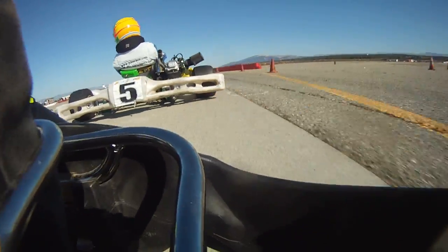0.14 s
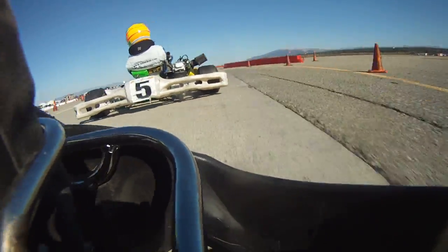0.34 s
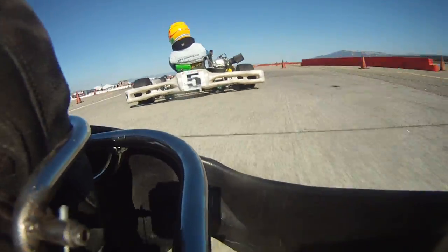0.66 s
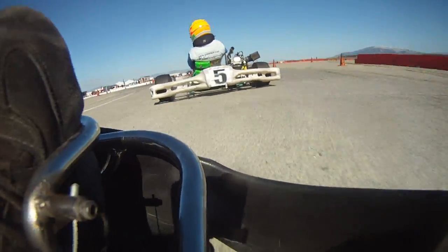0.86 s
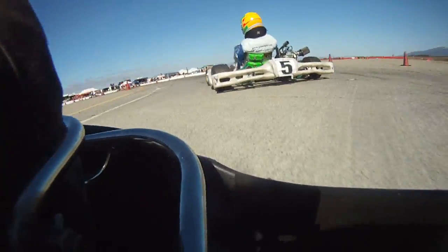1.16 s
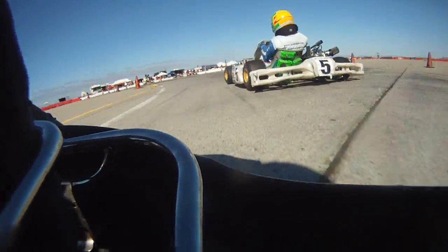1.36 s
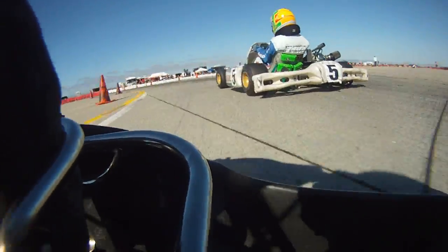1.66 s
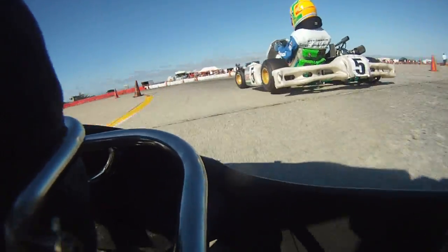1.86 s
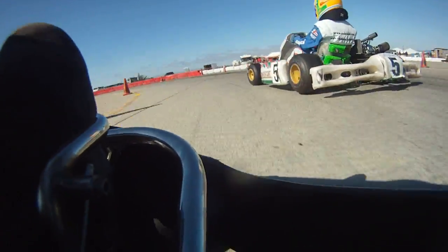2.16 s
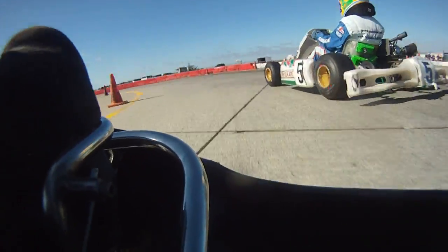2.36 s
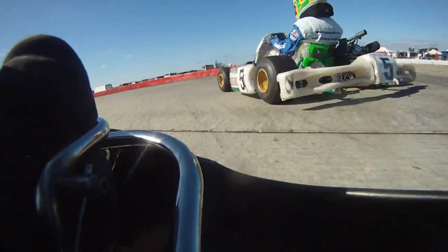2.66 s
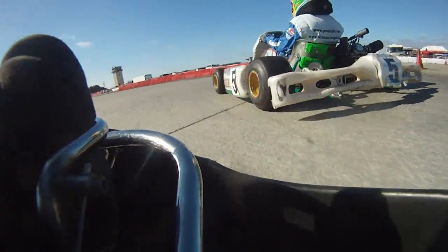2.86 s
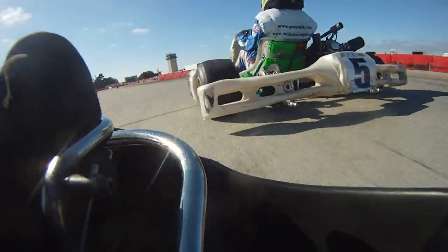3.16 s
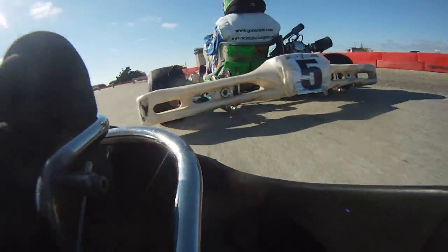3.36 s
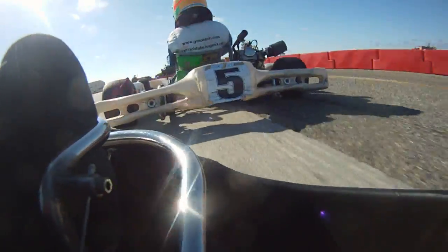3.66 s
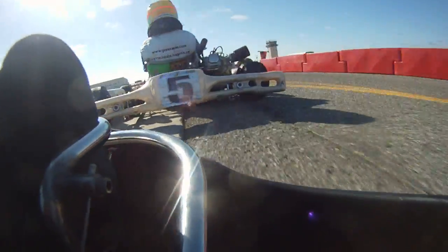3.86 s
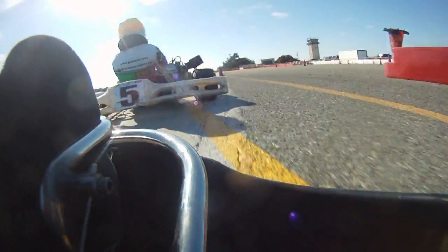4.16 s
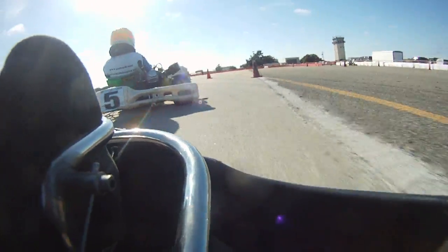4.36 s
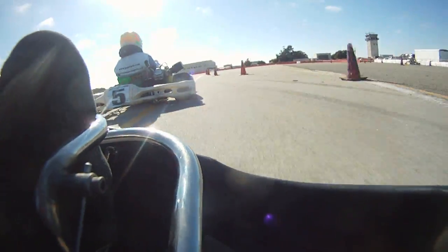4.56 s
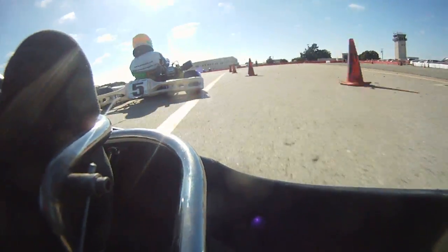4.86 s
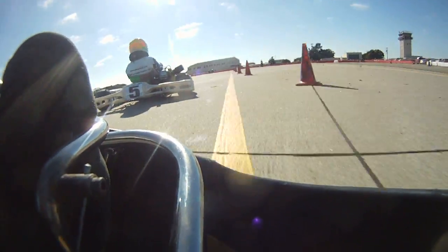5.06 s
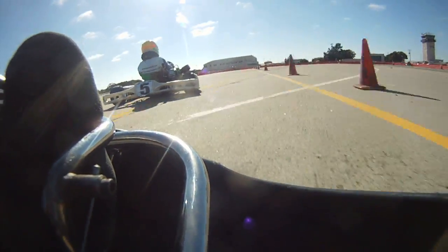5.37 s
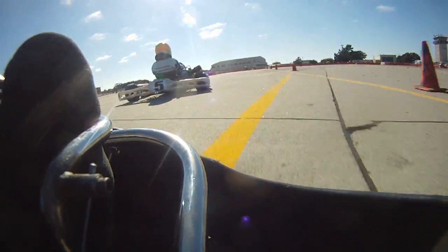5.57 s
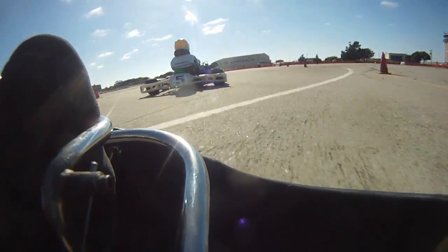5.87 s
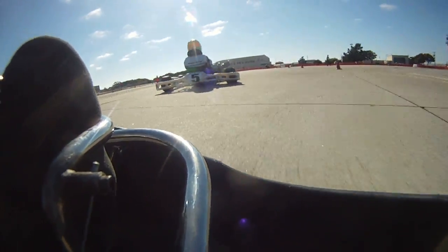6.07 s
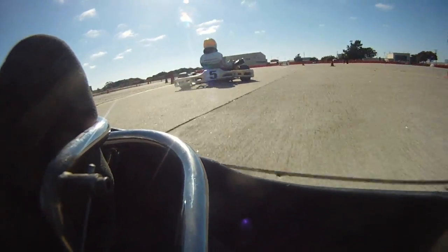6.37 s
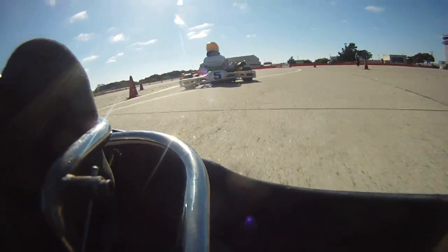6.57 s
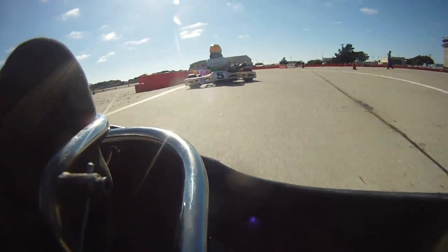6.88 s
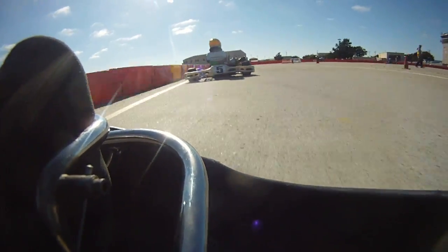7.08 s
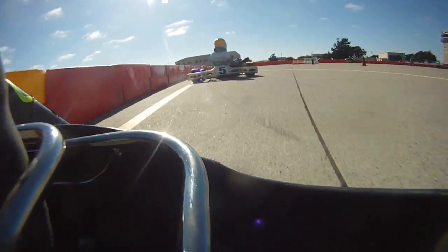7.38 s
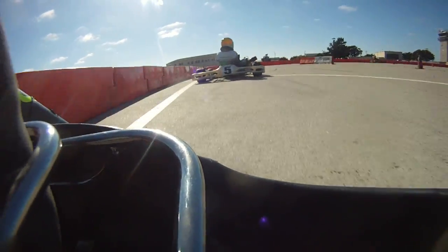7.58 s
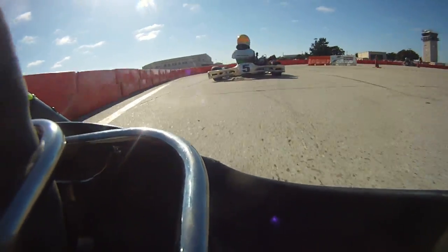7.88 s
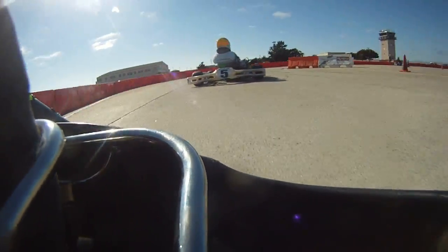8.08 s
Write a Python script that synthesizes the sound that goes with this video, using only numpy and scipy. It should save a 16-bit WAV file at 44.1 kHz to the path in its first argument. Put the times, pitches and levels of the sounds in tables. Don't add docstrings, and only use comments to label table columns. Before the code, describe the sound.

Close onboard sound from a small racing kart, heard through a sealed camera case: boomy, boxy, distorted, with gritty low-rate treble and almost no stereo width. At first a rapid single-cylinder buzz, about 44 pulses a second, rises slightly beside a second kart's smoother drone. From about 0.3 s jolts begin; the exhaust crackle weakens by 1 s, returns briefly around 1.5 s, then drops away near 1.8 s as both engines coast down in pitch. Thick thuds, loose rattles and lumpy wind rumble dominate until about 3.4 s, with an especially hard bang near 3.2 s. At 3.6 s the near engine comes back with rasping cracks, low and steady at about 34 pulses. The ride is smoother; the rival swells from 4.4 s. Both climb gradually after 6 s, with bumps near 6.4 and 6.9 s, less shaking around 7.5 s, and a rumbling shudder near 8 s.

```python
import sys
import numpy as np
from scipy import signal
from scipy.fft import rfft, irfft, next_fast_len
from scipy.io import wavfile
from scipy.ndimage import uniform_filter1d

SR = 44100
rng = np.random.default_rng(int(sys.argv[2]) if len(sys.argv) > 2 else 0)


def materialize(psi):
    bounded = np.clip(np.atleast_2d(psi).T, -1, 1)
    quanta = np.round(bounded * 32767).astype(np.int16)
    wavfile.write(sys.argv[1], SR, quanta)


def voltage_ratio(decibels):
    exponent = np.asarray(decibels, float) / 20
    return 10 ** exponent


N = 362943
T_S = np.arange(N) / SR

# time_s, firing_hz
OWN_SPEED = [(0.0, 43.85), (0.78, 45.3), (1.33, 45.47), (1.63, 43.76), (1.93, 41.42), (3.41, 34.86),
             (3.655, 34.63), (3.75, 33.83), (4.25, 34.36), (4.345, 33.87), (4.935, 34.05), (5.095, 34.54),
             (5.47, 33.5), (6.03, 33.81), (6.47, 34.87), (7.185, 37.46), (8.23, 40.61)]
# time_s, burn_db
THROTTLE = [(0, -0.5), (.45, -5.5), (.6, -10), (1, -15), (1.5, -8.5), (1.8, -29), (3.3, -18), (3.6, -3),
            (3.69, 1), (3.9, -5), (4.1, -0.5), (5.1, -0.5), (5.9, -5.5), (6.8, -9.5), (7.3, -2.5),
            (7.7, -10), (8, -4.5), (8.23, -8.5)]
# freq_hz, level_db
OWN_PULSE = [(30, -26), (70, -13), (140, -8), (175, -1), (265, 1), (320, -3), (400, -7), (480, -13),
             (600, -23), (800, -35), (1200, -55)]
# freq_hz, level_db
OUTLET = [(700, -30), (1500, -7), (2200, 0), (2700, -1), (3200, -6), (4000, -8.5), (6000, -21)]
# freq_hz, level_db
HISS = [(2500, -27), (3500, -8.5), (4200, -2.5), (4900, -5.5), (5150, -11), (6000, -8)]

# time_s, firing_hz
RIVAL_SPEED = [(0.0, 44.55), (1.0, 46.55), (1.22, 46.51), (2.0, 43.72), (3.12, 39.09), (3.97, 36.16),
               (4.34, 34.26), (4.63, 35.16), (4.97, 35.07), (5.34, 36.37), (5.63, 35.07), (6.2, 35.9),
               (7.03, 37.89), (8.23, 41.98)]
# time_s, level_db
RIVAL_LEVEL = [
    (0, -3),
    (.4, -2),
    (1.2, -4.5),
    (1.7, -14),
    (3.8, -14),
    (4.4, -6),
    (6.2, -2),
    (6.6, 1.5),
    (7.6, 1.5),
    (8.23, -1),
]
# freq_hz, peak_db
RIVAL_PULSE = [(40, -50), (75, -28), (110, -33), (180, -27), (250, -31), (380, -32), (440, -25),
               (485, -22.5), (530, -26), (580, -37), (700, -44), (900, -60)]
RIVAL_PIPE = {9: 6, 10: -5, 11: 2, 12: 5, 13: 1.5, 17: 6, 18: 5}

# start_s, thud_db, thud_hz, rattle_db
BUMPS = [(0.163, -18, 384, -39), (0.289, -4.5, 91, -28), (0.446, 4, 190, -29), (0.493, -7, 64, -38),
         (0.669, 3, 182, -17), (0.739, -1.5, 229, -33), (0.761, 1, 220, -28), (0.957, 7.5, 206, -30),
         (1.045, -1, 237, -26), (1.193, 6.5, 149, -20), (1.511, 1, 134, -21), (1.563, 2, 258, -27),
         (1.651, 2, 204, -20), (1.706, 2, 206, -47), (1.831, 0, 337, -19), (1.892, -7, 117, -28),
         (1.932, 1.5, 138, -22.5), (2.075, 3, 119, -16.5), (2.147, -8, 232, -24), (2.28, -6, 80, -25),
         (2.38, 3.5, 105, -19), (2.452, 5, 194, -20.5), (2.587, 3.5, 174, -26.5), (3, -1, 207, -42),
         (3.085, 0.5, 277, -35), (3.179, -6, 83.4, -24), (3.237, 7.5, 127, -14), (3.4, -2, 286, -27),
         (6.371, 4.5, 179, -38), (6.93, -7, 188, -29)]
# time_s, shake_db
SHAKE = [(0, -8), (.3, -12.5), (.45, -6.5), (1.4, -5.5), (2.1, -3), (2.3, 2), (3.4, 0), (3.6, -4),
         (3.95, -6), (4.35, -11), (5.7, -11), (6.2, -9.5), (6.9, -9.5), (7.2, -28), (7.7, -35),
         (8.23, -6.5)]
# centre_s, extra_rumble_db, extra_rattle_db
SHUDDERS = [(0, -3, 3), (.87, 8, 3.5), (1.19, 2, -0.5), (1.36, 6.5, 2.5), (1.7, 6, -2), (2.25, 2.5, 3.5),
            (2.86, 3, 2.5), (3.37, 4, 2.5), (3.78, 3.5, 1.5), (4.51, 2, 0.5), (4.74, 3, 5), (5.29, 4, 1),
            (5.98, 2, 2.5), (6.28, 4, 1.5), (6.9, 6.5, 1), (7.97, 10, -1)]
# freq_hz, level_db
RUMBLE = [(15, -2), (30, 6.5), (70, 12), (125, 14), (200, 2), (400, -71), (6000, -56)]
# freq_hz, level_db
ROAR = [(60, -70), (140, 0.5), (250, 2), (350, -1), (450, -13.5), (600, -16.5), (850, -26), (1100, -56),
        (6000, -56)]
# freq_hz, level_db
HOLLOW = [(250, -16), (400, -1.5), (510, -1), (570, -6), (680, -8.5), (800, -22), (1000, -55), (6000, -56)]
# freq_hz, level_db
RATTLE = [(500, 0), (900, 0), (1300, -5), (2000, -4), (2400, -5.5), (2900, -4), (3300, -12), (4500, -19),
          (5200, -38), (6000, -56)]
# freq_hz, level_db
KNOCK = [(600, -5.5), (900, -7), (1300, -8), (1900, -13.5), (3000, -27), (6000, -69)]

OWN_START_CYCLES, RIVAL_START_CYCLES = -.25, -.38


def evened(x):
    return x / np.sqrt(np.mean(x ** 2) + 1e-20)


def curves(rows):
    time_s, *columns = np.transpose(rows)
    return [np.interp(T_S, time_s, column) for column in columns]


def colour(x, points):
    size = next_fast_len(N + 8192)
    freq_hz, level_db = np.transpose(points)
    bins_hz = np.fft.rfftfreq(size, 1 / SR)
    gain = voltage_ratio(np.interp(np.log(bins_hz + 1), np.log(freq_hz + 1), level_db))
    return evened(irfft(rfft(x, size) * gain, size)[:N])


def noise(points):
    return colour(rng.standard_normal(N), points)


def lumps(rate_hz):
    size = max(int(SR / rate_hz / 2), 1)
    smooth = uniform_filter1d(rng.standard_normal(N), size)
    return evened(uniform_filter1d(smooth, size))


def firings(speed, start_cycles):
    cycles = start_cycles + np.cumsum(curves(speed)[0]) / SR
    return np.interp(np.arange(0, int(cycles[-1]) + 1), cycles, T_S)


def clicks(time_s, size):
    at = np.clip(np.round(time_s * SR).astype(int), 0, N - 1)
    return np.bincount(at, size, N)


def cracks(fire_s, chance, pitch_hz, spread, lead_s, rise_s, fall_s, spread_db):
    before, after = 200, 500
    t = np.arange(-before, after) / SR
    shape = np.where(t < 0, np.exp(-(t / rise_s) ** 2), np.exp(-t / fall_s))
    puff_hz = pitch_hz * np.exp(spread * chance[:, :1])
    whistle = np.cos(2 * np.pi * puff_hz * t)
    breath = 2.87 * rng.standard_normal((len(fire_s), len(t)))
    puffs = (whistle + breath) * shape * voltage_ratio(spread_db * chance[:, 1:2])
    first = np.round((fire_s - lead_s) * SR).astype(int)
    at = np.clip(first[:, None] + np.arange(before + after), 0, None)
    train = np.bincount(at.ravel(), puffs.ravel(), N + before)
    return colour(train[before:N + before], OUTLET)


def limping(fire_s, firing_hz, chance):
    pull_s, pull_hz_per_s = .9, .8
    gain_hz_per_s = uniform_filter1d(np.gradient(firing_hz) * SR, round(pull_s * SR), mode="nearest")
    limp_ms = np.interp(gain_hz_per_s / pull_hz_per_s, [.5, 1.5], [.13, .04])
    limp = (-1.) ** np.arange(len(fire_s)) - .4 * chance
    return fire_s - np.interp(fire_s, T_S, limp_ms) / 1000 * limp


def own_engine():
    burn_db, firing_hz = curves(THROTTLE)[0], curves(OWN_SPEED)[0]
    fire_s = firings(OWN_SPEED, OWN_START_CYCLES)
    chance = rng.standard_normal((len(fire_s), 4))
    fire_s = limping(fire_s, firing_hz, chance[:, 2])

    thump_db = -16 + np.clip(.4 * (burn_db + 6), -11, 0)
    thump = colour(clicks(fire_s, voltage_ratio(1.3 * chance[:, 3])), OWN_PULSE)

    crack_db = -32.5 + burn_db
    crack = cracks(fire_s, chance, pitch_hz=2600, spread=.07, lead_s=.0013, rise_s=.0011, fall_s=.002, spread_db=1.8)

    hum_db = -39 + 1.3 * (firing_hz - 34) + .3 * burn_db
    hum = np.sqrt(2) * np.cos(4 * np.pi * (OWN_START_CYCLES + np.cumsum(firing_hz) / SR))

    hiss_db = -40.5 + .29 * np.maximum(burn_db, -14) + 2.6 * lumps(3.4)
    hiss = colour(rng.standard_normal(N) * voltage_ratio(1.3 * lumps(70)), HISS)
    return voltage_ratio(thump_db) * thump + voltage_ratio(crack_db) * crack + voltage_ratio(hum_db) * hum + voltage_ratio(hiss_db) * hiss


def rival_engine():
    firing_hz = curves(RIVAL_SPEED)[0]
    cycles = RIVAL_START_CYCLES + np.cumsum(firing_hz) / SR
    freq_hz, peak_db = np.transpose(RIVAL_PULSE)
    drone = np.zeros(N)
    for k in range(1, 21):
        level_db = np.interp(np.log(k * firing_hz), np.log(freq_hz), peak_db)
        level_db = level_db + RIVAL_PIPE.get(k, 0) + 1.3 * lumps(9)
        phase_cycles = rng.random() * (k > 6)
        drone += voltage_ratio(level_db) * np.cos(2 * np.pi * (k * cycles + phase_cycles))
    fire_s = firings(RIVAL_SPEED, RIVAL_START_CYCLES)
    chance = rng.standard_normal((len(fire_s), 2))
    crack = cracks(fire_s, chance, pitch_hz=2400, spread=.2, lead_s=.0028, rise_s=.001, fall_s=.002, spread_db=2.5)
    return voltage_ratio(curves(RIVAL_LEVEL)[0]) * (drone + voltage_ratio(-47) * crack)


def bumps():
    t = np.arange(2200) / SR
    thuds, shakes = np.zeros(N + len(t)), np.zeros(N + len(t))
    for start_s, thud_db, thud_hz, rattle_db in BUMPS:
        first = round(start_s * SR)
        part = slice(first, first + len(t))
        swing = t * thud_hz / 0.82
        envelope = np.e * swing * np.exp(-swing ** 2.8)
        thuds[part] -= voltage_ratio(thud_db - 1) * envelope * np.sin(2 * np.pi * thud_hz * t)
        shakes[part] += voltage_ratio(rattle_db - 4.0) * (t / 0.0027) * np.exp(1 - t / 0.0031)
    return thuds[:N] + shakes[:N] * noise(RATTLE)


def shaking():
    shake_db = curves(SHAKE)[0]
    centre_s, *extra_db = np.transpose(SHUDDERS)
    shudder_s = 0.075
    shudder = np.exp(-((T_S - centre_s[:, None]) / shudder_s) ** 2)
    extra_rumble_db, extra_rattle_db = np.array(extra_db) @ shudder
    gust = lumps(23.3) * (1 + .045 * shake_db)

    rumble_db = -16 + shake_db + extra_rumble_db + 0.33 * lumps(19.0)
    roar_db = -16.5 + .45 * shake_db + 2.4 * gust
    hollow_db = -20.5 + 0.083 * shake_db + 2.0 * gust
    rattle_db = -34.5 + 0.045 * shake_db + extra_rattle_db
    knock_db = -38.5 + shake_db + extra_rattle_db

    grit = rng.standard_normal(N) * voltage_ratio(2.4 * lumps(162) + 0.8 * gust)
    wind = voltage_ratio(roar_db) * noise(ROAR) + voltage_ratio(hollow_db) * noise(HOLLOW)
    loose = voltage_ratio(rattle_db) * colour(grit, RATTLE) + voltage_ratio(knock_db) * colour(grit[::-1], KNOCK)
    return voltage_ratio(rumble_db) * noise(RUMBLE) + wind + loose


def scene():
    return np.tile(own_engine() + rival_engine() + bumps() + shaking(), (2, 1))


def low_pass(x):
    return signal.sosfilt(signal.butter(12, 16490, fs=SR, output="sos"), x)


def record(dry):
    ceiling, hold = .72, 4
    up, down = 40, 147
    slow = signal.resample_poly(dry, up, down, axis=1)
    slow = slow / (1 + abs(slow / ceiling) ** 14) ** (1 / 14)
    held = np.repeat(slow, hold, axis=1)
    out = signal.resample_poly(held, down, up * hold, axis=1)[:, :N]
    lowpass = signal.firwin(255, 15450, window=("kaiser", 8), fs=SR)
    out = signal.oaconvolve(out, lowpass[None], "same")
    steps = rng.standard_normal(N // 441 + 1).repeat(441)[:N]
    drift = voltage_ratio(-24.5) * np.maximum(lumps(40) - 1.1, 0) * steps
    out = np.clip(out * (1 + np.outer([1, -1], drift)), -ceiling, ceiling)
    return low_pass(out)


dry = scene()
out = record(dry)
materialize(out)
```